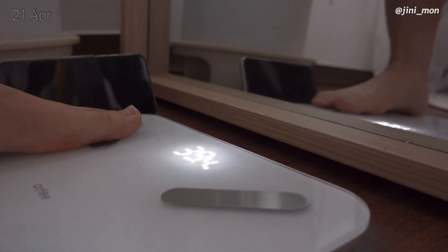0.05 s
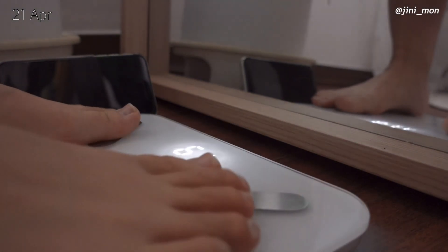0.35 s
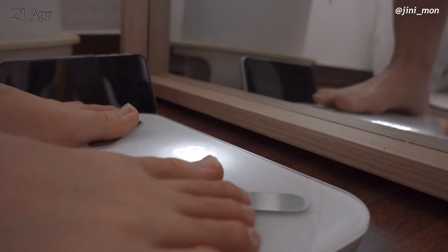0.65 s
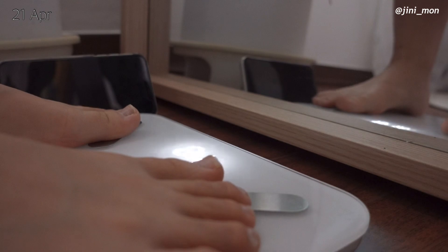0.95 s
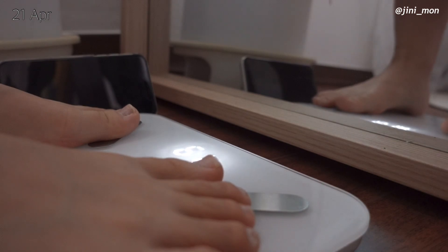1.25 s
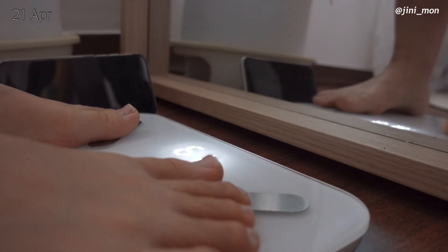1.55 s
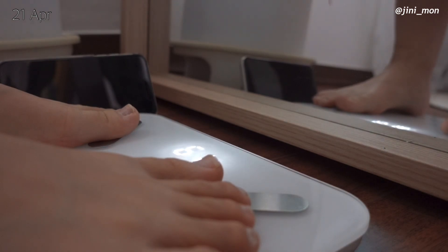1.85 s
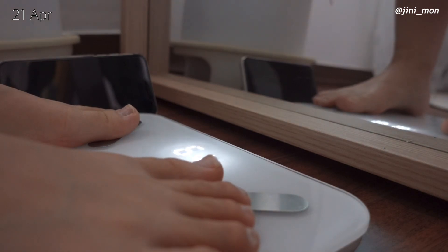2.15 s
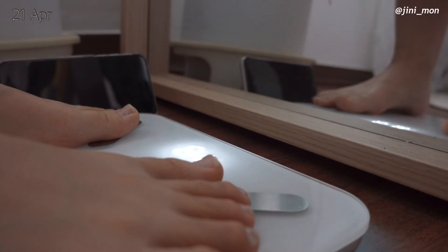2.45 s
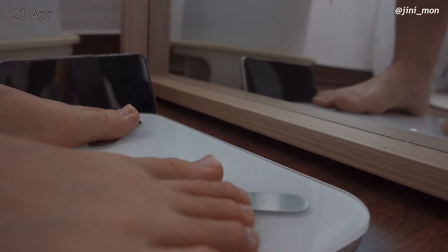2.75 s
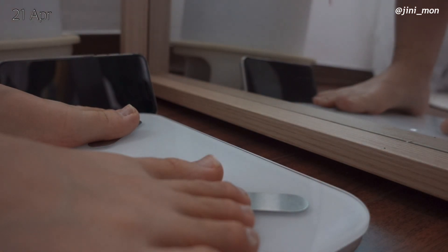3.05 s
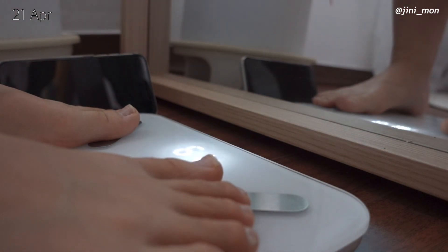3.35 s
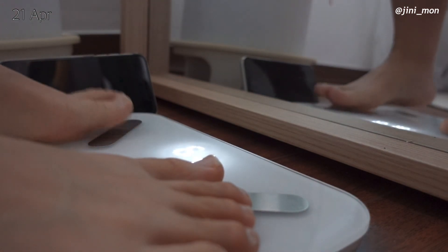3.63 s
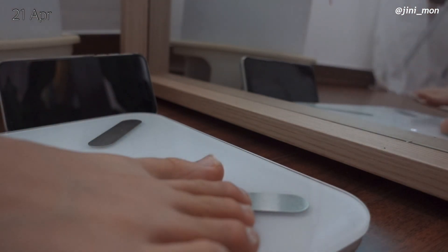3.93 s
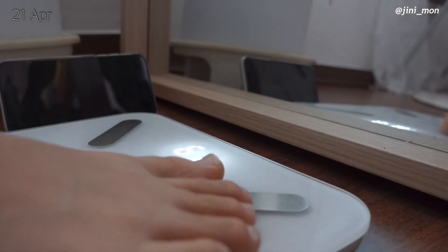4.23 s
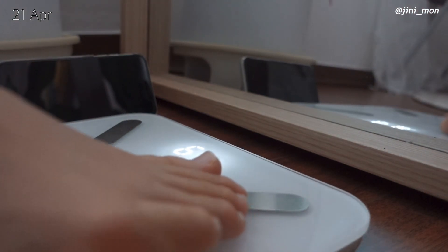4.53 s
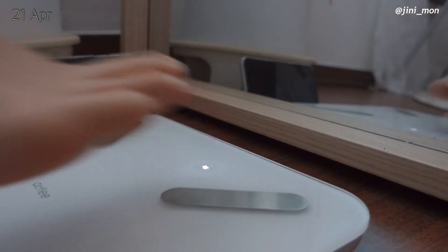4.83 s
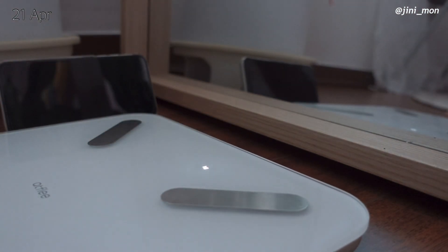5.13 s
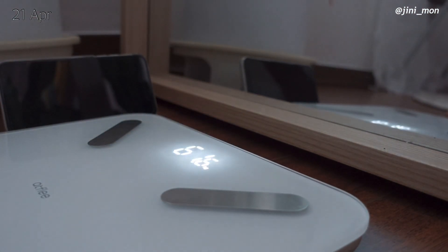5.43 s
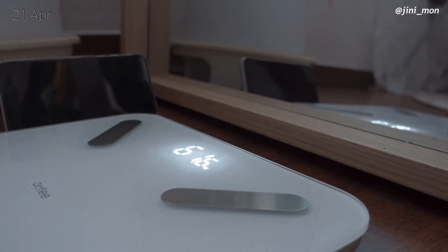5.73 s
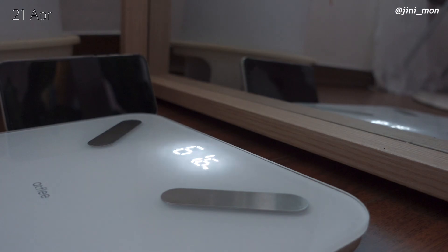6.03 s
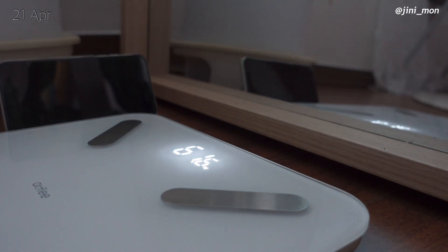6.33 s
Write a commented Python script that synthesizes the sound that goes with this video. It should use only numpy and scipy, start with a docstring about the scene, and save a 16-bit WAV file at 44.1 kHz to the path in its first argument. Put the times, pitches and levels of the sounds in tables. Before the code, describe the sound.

A glass scale creaks and clicks underfoot, settles quietly, then creaks again and rattles against the wooden floor as the feet leave.

```python
"""In a small quiet room with a steady hiss, bare feet step onto a glass bathroom scale on a wooden floor.
Plate and plastic feet creak in single sharp slips, the harder ones set the glass ringing; the boards thump.
The housing ticks as it settles. Then the weight shifts, soles slide, and the feet step off in turn;
as the last one leaves, the scale rocks with a dull clatter. Cloth rustles softly at the end."""
import sys
import numpy as np
from scipy import signal
from scipy.fft import rfft, irfft
from scipy.io import wavfile
from scipy.ndimage import uniform_filter1d

SR = 44100
rng = np.random.default_rng(int(sys.argv[2]) if len(sys.argv) > 2 else 0)


def unload_audio(sound):
    """Save the sound as a 16-bit wav file, at the path given as the first command line argument."""
    columns = np.transpose(np.atleast_2d(sound))
    # keep every value between -1 and 1, then stretch to whole-number steps
    steps = np.round(np.clip(columns, -1, 1) * 32767)
    wavfile.write(sys.argv[1], SR, steps.astype(np.int16))


N = 281358
SIZE = 16384   # samples in one impulse response
HZ = np.maximum(np.fft.rfftfreq(SIZE, 1 / SR), 1)
AGE = np.arange(SIZE) / SR   # seconds since a blow

# Stereo width of the near sources. Each row: frequency in Hz, side relative to mid in dB.
SOURCE_WIDTH = [(100, -11), (300, -31), (700, -16.5), (2500, -13.5), (5500, -8.5), (10000, -5.5),
                (16000, -7)]
# Stepping on, first foot off, second foot off.
# Each row: start in seconds, length in seconds, level of sliding in dB, level of rumble in dB.
WEIGHT_SHIFTS = [(0.014, 0.53, -53, -70), (3.513, 0.042, -44.5, -79), (4.386, 0.32, -46.5, -69.5)]


def from_db(db):
    """Amplitude grows tenfold for every 20 dB."""
    return 10 ** (np.asarray(db) / 20)


def at_hz(points, hz):
    """A spectrum in dB, interpolated on a logarithmic frequency axis."""
    f, db = np.transpose(points)
    return np.interp(np.log(np.maximum(hz, 1)), np.log(f), db)


def add(out, s, sound):
    """Superposition: a stereo sound joins the mix at s seconds."""
    i = max(int(s * SR), 0)
    out[:, i:i + SIZE] += sound[:, :N - i]


def unit_power(gain):
    """Normalisation to a mean square of one."""
    return gain / np.sqrt(np.mean(np.abs(gain) ** 2))


def stereo(mid, side):
    """Left and right are the sum and difference of mid and side."""
    return np.array([mid + side, mid - side])


def peak(hz, width_hz):
    """Lorentzian resonance curve of height one."""
    return 1 / (1 + ((HZ - hz) / (width_hz / 2)) ** 2)


def decay(t60):
    """Damping: amplitude falls exponentially, by 60 dB in t60 seconds."""
    return from_db(-60 * AGE / t60)


def causal(gain):
    """Minimum-phase response with this gain: nothing sounds before the blow."""
    cepstrum = irfft(np.log(gain + 1e-9))
    cepstrum[1:SIZE // 2] *= 2
    cepstrum[SIZE // 2 + 1:] = 0
    return np.exp(rfft(cepstrum))


def scatter(envelope, direct=0, even_hz=900):
    """Multiple reflection: the spectrum of a pulse and its dense echoes, evened out over broad bands."""
    wave = rng.standard_normal(SIZE) * envelope / np.sqrt(np.sum(envelope ** 2))
    wave[0] += direct
    spectrum = rfft(wave)
    power = uniform_filter1d(np.abs(spectrum) ** 2, max(int(even_hz * SIZE / SR), 3))
    return spectrum * causal(power ** -.5)


def noise(colour, width):
    """Spectrally shaped Gaussian noise in stereo, its mid signal at unit power."""
    hz = np.fft.rfftfreq(N, 1 / SR)
    mid, side = rfft(rng.standard_normal((2, N))) * unit_power(from_db(at_hz(colour, hz)))
    return irfft(stereo(mid, side * from_db(at_hz(width, hz))), N)


def swells(rows, rise_db_per_s, fall_db_per_s):
    """Envelope of movements that each grow exponentially, hold and die away."""
    t = np.arange(N) / SR
    gain = np.zeros(N)
    for start, length, db in rows:
        before, after = np.maximum(start - t, 0), np.maximum(t - start - length, 0)
        gain += from_db(db - rise_db_per_s * before - fall_db_per_s * after)
    return gain


def rubbing(gain, colour, grain_db, grain_s=0.0041):
    """Friction noise, modulated in amplitude as the surfaces catch and let go."""
    grain = unit_power(uniform_filter1d(rng.standard_normal(N), int(grain_s * SR)))
    return gain * from_db(grain_db * grain) * noise(colour, SOURCE_WIDTH)


def background():
    """A continuous spectrum of hiss under the faint line spectrum of a distant appliance."""
    # Each row: frequency in Hz, relative spectral density in dB.
    hiss_colour = [(15, -67), (25, -45), (61, -19), (108, -17), (190, -12), (344, -6.5), (405, -10),
                   (734, 0.5), (796, 1), (1740, -2), (3080, -9.5), (4030, -10.5), (5000, -14), (14800, -20),
                   (16000, -22)]
    # Each row: frequency in Hz, side relative to mid in dB.
    hiss_width = [(60, -20), (150, -13), (380, -1.5), (950, -1), (2380, 1.5), (5980, -0.5), (15000, -5.5)]
    # Each row: frequency in Hz, rms level in dB.
    hum_tones = [(80.7, -88.5), (118.4, -81.5), (161.5, -83.5), (269.2, -86), (726.7, -70.5)]
    t = np.arange(N) / SR
    hum = sum(from_db(db) * np.sqrt(2) * np.sin(2 * np.pi * (hz * t + rng.random()))
              for hz, db in hum_tones)
    return from_db(-54.5) * noise(hiss_colour, hiss_width) + hum


def room(x, t60=0.36, wall_hz=5000, build_s=0.006):
    """Reverberation: a diffuse tail, different left and right, dulled by absorption at the walls."""
    tail = rng.standard_normal((2, SIZE)) * decay(t60) * (1 - np.exp(-AGE / build_s))
    walls = signal.butter(1, wall_hz, fs=SR, output="sos")
    tail = signal.sosfilt(walls, unit_power(tail) / np.sqrt(SIZE))
    return signal.fftconvolve(x, tail, axes=1)[:, :N]


def board_rumble(lag_s=0.24):
    """Delayed yielding: the boards give a little after the load moves, and rumble."""
    # Each row: frequency in Hz, relative level in dB.
    rumble_colour = [(25, -26), (65, -10), (110, -9), (200, 2.5), (320, -3.5), (700, -10), (3000, -55)]
    yielding = [(s + lag_s, length, db) for s, length, _, db in WEIGHT_SHIFTS]
    gain = swells(yielding, rise_db_per_s=15, fall_db_per_s=23)
    return rubbing(gain, rumble_colour, grain_db=2.0, grain_s=0.053)


def cloth():
    """Friction between moving folds of cloth makes a soft broadband rustle."""
    # Each row: start in seconds, length in seconds, level in dB.
    brushes = [(0, 0.15, -54), (4.15, 0.48, -58), (5.38, 0.033, -67), (5.98, 0.57, -54)]
    # Each row: frequency in Hz, relative level in dB.
    rustle_colour = [(30, -60), (300, -14), (1500, -4.5), (3000, -2), (6500, -2), (9000, -9.5),
                     (16000, -14)]
    gain = swells(brushes, rise_db_per_s=36, fall_db_per_s=23)
    return rubbing(gain, rustle_colour, grain_db=1.0)


def soles():
    """Sliding friction of skin on glass while the weight shifts."""
    # Each row: frequency in Hz, relative level in dB.
    slide_colour = [(60, -43), (250, -7), (500, -0.5), (1200, -0.5), (2500, -6), (5000, -13), (16000, -27)]
    slides = [(s, length, db) for s, length, db, _ in WEIGHT_SHIFTS]
    gain = swells(slides, rise_db_per_s=136, fall_db_per_s=47)
    return rubbing(gain, slide_colour, grain_db=-0.5)


def board_thumps(t60=0.14, level_db=-5.5, side_db=-19):
    """Damped impulse response: the boards answer a change of load with a short dull knock."""
    # Weight lands on the boards. Each row: time in seconds, relative level in dB.
    landings = [(0.407, -16), (0.34, -21), (0.513, -13), (0.545, -18), (0.731, -27), (4.166, -24),
                (3.575, -24), (4.38, -10.5), (4.457, -30), (4.526, -7.5), (4.765, -1), (4.781, -3),
                (4.806, 2.5), (4.831, -2)]
    # Each row: frequency in Hz, relative level in dB.
    thump_colour = [(30, -42), (80, -21), (160, -14.5), (255, -5), (330, 1.5), (520, 5), (900, -19),
                    (3000, -56)]
    boards = causal(unit_power(from_db(at_hz(thump_colour, HZ))))
    fade = decay(t60)
    out = np.zeros((2, N))
    for s, db in landings:
        knock = stereo(scatter(fade, even_hz=245), from_db(side_db) * scatter(fade))
        add(out, s, from_db(db + level_db) * irfft(knock * boards))
    return out


def settling_ticks(bass_db=1.5, ring_db=-10, t60=0.029, lift_db=6.5):
    """Light impulses from the settling housing, as thin, quickly damped blows."""
    # Each row: time in seconds, strength in dB, hardness as treble in dB, pitch in Hz.
    ticks = [(0.815, -22, 5.5, 2570), (1.3988, -27.5, 5.5, 2600), (2.3614, -19, -4.5, 1430),
             (3.3783, -21.5, -4, 2620), (3.9856, -11, 3.5, 3780), (4.096, -26, 4.5, 4000),
             (4.208, -10.5, -7, 1430), (4.6666, -22.5, 6, 600), (5.884, -31, 13.5, 3120),
             (5.9364, -16, 7.5, 3920), (6.3152, -29.5, 13, 3130)]
    return [(s, db, bass_db, treble, ring_db, t60, hz, lift_db) for s, db, treble, hz in ticks]


def rocking_knocks(bass_db=6, ring_db=-16.5, lift_db=8):
    """Impacts of the rocking scale on the floor: full blows, fastest as the last foot leaves."""
    # Each row: time in seconds, strength in dB, hardness as treble in dB, pitch in Hz, T60 in seconds.
    knocks = [(0.2964, -13, -15, 614, 0.046), (0.338, 1.5, -17, 1770, 0.043),
              (0.3656, -8, -27, 1710, 0.045), (0.543, -7, -8, 2200, 0.04), (0.7307, -20.5, -18, 860, 0.044),
              (3.454, -11.5, -27, 600, 0.06), (3.562, -6, -3, 1010, 0.087), (4.315, -4, -11, 1140, 0.077),
              (4.34, -9.5, -33, 600, 0.1), (4.456, 1.5, -7, 573, 0.077), (4.565, -5.5, -11, 640, 0.075),
              (4.761, 9.5, -17, 1090, 0.071), (4.7764, 6, -13, 587, 0.066), (4.792, 6, -16, 1760, 0.11),
              (4.8116, 5, -12, 1240, 0.1), (4.8297, 0, -14, 1810, 0.087), (4.843, -8, -15, 1710, 0.047),
              (4.8632, -10, -19, 1030, 0.055), (4.8932, -16.5, -22, 1000, 0.066),
              (5.0142, -17.5, -26, 1232, 0.061), (5.0286, -8.5, -18, 2100, 0.062)]
    return [(s, db, bass_db, treble, ring_db, t60, hz, lift_db) for s, db, treble, hz, t60 in knocks]


def creaking_slips(full_db=8, bass_per_db=0.5, t60=0.036):
    """Stick-slip: plastic feet and housing give way under load; the weaker the blow, the more body."""
    # Each row: time in seconds, strength in dB, hardness as treble in dB, share of glass ring in dB,
    # pitch of the slipping part in Hz, lift at that pitch in dB.
    slips = [(0.1343, 7, 1.5, -11, 2430, 9.5), (0.226, 7, -12, -13, 2290, 6.5),
             (0.3126, 6.5, -2, -15, 985, 13), (0.3209, 3.5, -10, -5, 2650, 7),
             (0.3917, -12, 4.5, -8, 2600, -2), (0.4058, -0.5, -4.5, -8, 3660, 3),
             (0.4251, 2.5, -9.5, -9, 1870, 3), (0.4604, 7, 3, -2.5, 2520, 11.5),
             (0.5098, 6, 1.5, -12, 3000, 9.5), (3.407, -13, 3.5, -12, 1300, 8),
             (3.4623, -11, 3.5, -20, 580, 13), (3.4763, -7, -4, -5, 1400, 14),
             (3.4825, -3.5, 6, -7, 1400, 13), (3.4913, 8.5, -3.5, -12, 2450, 10),
             (3.533, 8, -1.5, -7, 690, 10), (3.5839, 8, 0.5, -2, 2640, 3), (3.6107, 4, 0, -16, 1570, 8.5),
             (3.647, -4, -6, -3.5, 2200, 6), (3.674, -27, 17.5, -0.5, 4100, -3),
             (3.7065, -17, 8, -23, 4300, 6), (4.1332, 7.5, -2, -6, 1970, 4.5),
             (4.2633, 9, 1, -4.5, 2600, 4), (4.3764, 5, -10.5, -14.5, 1920, 4),
             (4.418, 7, 7, -1.5, 2700, 9), (4.4421, 7.5, -4, -1, 2380, 9), (4.5222, -6, 4, -9, 650, 9),
             (4.539, 1, 1.5, 0, 2160, 7.5), (4.615, -17.5, 7, -9, 1120, 13.5),
             (4.6924, -2.5, 5.5, -17, 835, 3.5), (4.7679, 2.5, 2.5, -4.5, 1710, 5)]
    return [(s, db, bass_per_db * (full_db - db), treble, ring, t60, hz, lift)
            for s, db, treble, ring, hz, lift in slips]


def plate_paths(lag_hz=700, order=8):
    """Dispersion on the way to left and right: slow, low bending waves arrive after the crack."""
    # The near field favours one side. Each row: frequency in Hz, left minus right in dB.
    balance = [(300, -1.5), (680, 1), (780, 1), (980, 4), (1100, -1.5), (1500, -1), (1850, 2.5), (2600, -1),
               (3300, -0.5), (6500, -1.5), (9000, -2.5), (12000, 0)]
    pole = np.exp(-2 * np.pi * lag_hz / SR)
    unit_delay = np.exp(-2j * np.pi * np.fft.rfftfreq(SIZE))
    dispersion = ((unit_delay - pole) / (1 - pole * unit_delay)) ** order
    lean = from_db(at_hz(balance, HZ) / 2)
    return dispersion * np.array([causal(lean), causal(1 / lean)])


def glass_ring(t60=0.21, rise_s=0.0056, level_db=0.65):
    """Free vibration: the spectrum of the plate's dense modes as they build up and die away."""
    # Each row: frequency in Hz, relative level in dB.
    ring_colour = [(200, 1.5), (600, -3.5), (1300, -1), (2500, -5), (5000, -1.5), (9000, -1.5), (16000, 2)]
    envelope = decay(t60) * (1 - np.exp(-AGE / rise_s))
    return scatter(envelope) * causal(from_db(at_hz(ring_colour, HZ) + level_db))


def scale_body(blows, side_ring_db=1.5, part_bandwidth=0.19, bass_hz=900, centre_hz=2200, treble_hz=4800):
    """Source and filter: each blow echoes about the resonant housing and leaves the glass ringing."""
    # Broad spectrum of a blow. Each row: frequency in Hz, relative level in dB.
    blow_colour = [(60, -43), (150, -39), (280, -30), (440, -8), (700, -12), (1100, -10.5), (1700, -2),
                   (2500, -0.5), (3400, -2.5), (5500, -6.5), (8000, -16), (11000, -22.5), (16000, -34)]
    # Resonances of plate and housing. Each row: frequency in Hz, width in Hz, lift in dB.
    modes = [(534, 99, 1.5), (849, 99, 7), (1127, 98, 3.5), (1300, 51, 0.5), (1880, 53, -1.5),
             (2240, 140, 0.5), (2760, 120, 2), (3850, 89, 2.5), (4030, 140, 0), (6600, 330, 2)]
    resonance_db = sum(db * peak(hz, width) for hz, width, db in modes)
    body = from_db(at_hz(blow_colour, HZ) + resonance_db)
    glass_mid, glass_side = glass_ring(), glass_ring()   # the same modes for every blow
    paths = plate_paths()
    width = causal(from_db(at_hz(SOURCE_WIDTH, HZ)))
    out = np.zeros((2, N))
    for s, db, bass_db, treble_db, ring_db, rattle_t60, part_hz, lift_db in blows:
        rattle = decay(rattle_t60)
        part = unit_power(body * from_db(lift_db * peak(part_hz, part_bandwidth * part_hz)))
        contact = from_db(at_hz([(bass_hz, bass_db), (centre_hz, 0), (treble_hz, treble_db)], HZ))
        loaded = 0.485 < s < 4.66   # under full weight the plate drives the boards, adding body
        boards = from_db((3 if loaded else -1.5) * peak(hz=450, width_hz=520))
        mid = scatter(rattle, direct=0.34) + from_db(ring_db) * glass_mid
        side = width * (scatter(rattle) + from_db(ring_db + side_ring_db) * glass_side)
        spectrum = stereo(mid, side) * paths * causal(part * contact * boards)
        add(out, s, from_db(db) * irfft(spectrum))
    return out


def scene(room_db=-21.5):
    """Superposition of the close impacts, their faint reverberation, friction and the background."""
    blows = creaking_slips() + rocking_knocks() + settling_ticks()
    hits = scale_body(blows) + board_thumps()
    return hits + from_db(room_db) * room(hits) + cloth() + soles() + board_rumble() + background()


def record(dry, cutoff_hz=16000):
    """Band limiting: a steep elliptic low-pass removes the highest treble."""
    return signal.sosfilt(signal.ellip(10, .1, 70, cutoff_hz, fs=SR, output="sos"), dry)


dry = scene()
out = record(dry)
unload_audio(out)
```